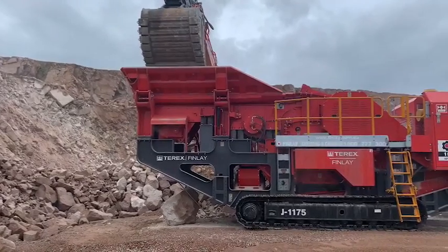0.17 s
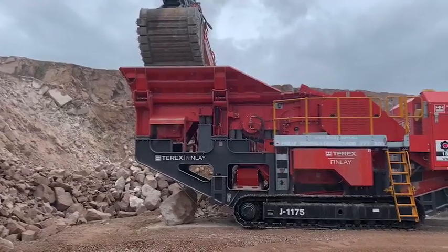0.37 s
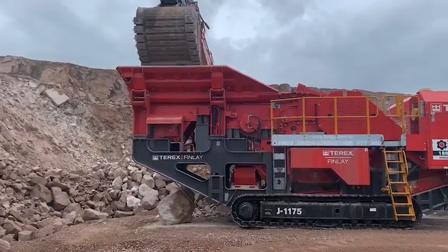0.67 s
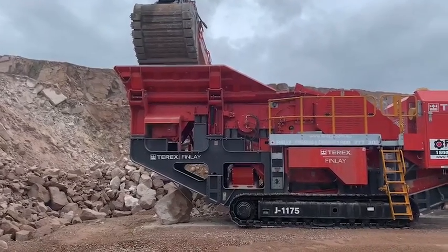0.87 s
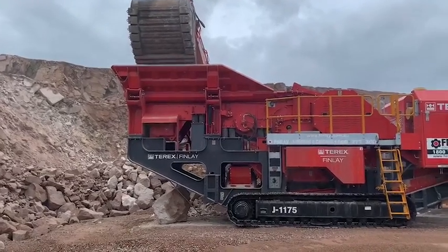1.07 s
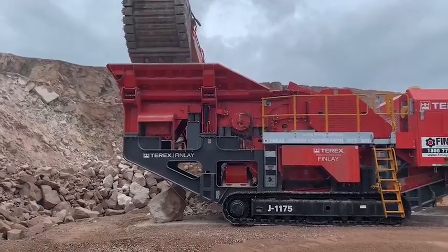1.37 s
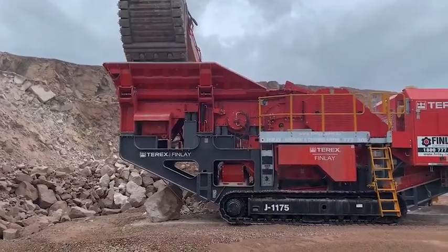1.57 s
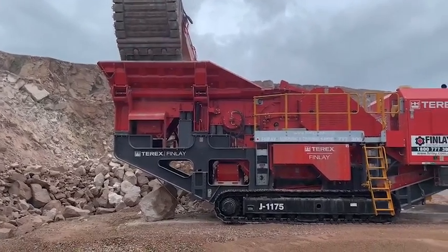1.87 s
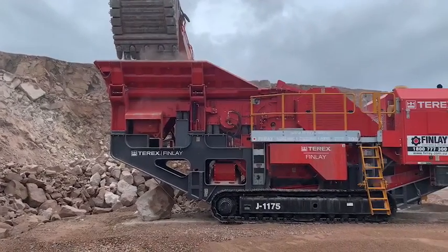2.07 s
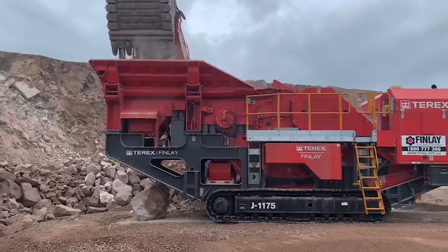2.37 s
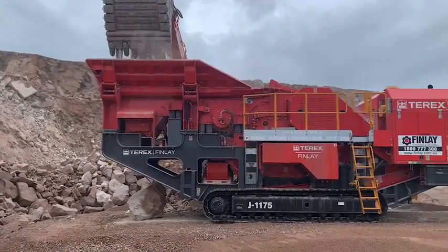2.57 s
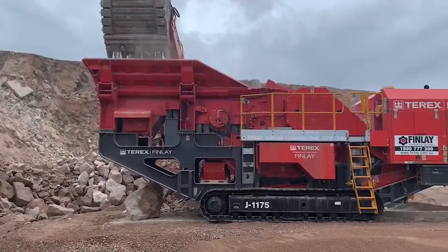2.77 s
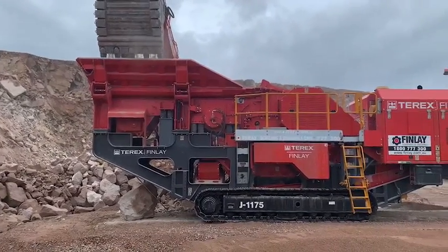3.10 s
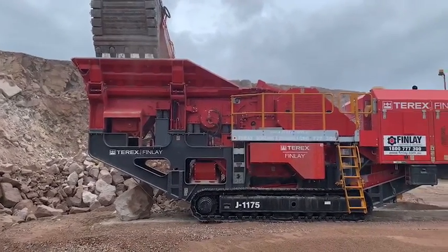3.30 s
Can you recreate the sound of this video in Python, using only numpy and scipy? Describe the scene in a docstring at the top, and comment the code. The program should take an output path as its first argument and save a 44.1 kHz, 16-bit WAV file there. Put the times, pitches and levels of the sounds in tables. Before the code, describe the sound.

A rock crusher crunches stone in uneven bites over a droning diesel in a quarry. Boulders thud on its steel hopper with a short echo. The rattling thins midway, then swells, and two bright clanks end it.

```python
"""A tracked jaw crusher works in a quarry. From the start its diesel drones and roars, broken stone
rattles through, and the jaw bites hardest as boulders thud on the steel hopper and jaw plates, with a
short echo off the quarry face. Two low clanks follow. Near 1.5 s the engine dips briefly and the stream
of stone thins, while the jaw crunches on in uneven bites, several a second. More boulders land, the
stream swells near 2.8 s, and two bright clanks ring out at the end."""
import sys
import numpy as np
from scipy import signal
from scipy.fft import rfft, irfft, next_fast_len
from scipy.io import wavfile
from scipy.ndimage import uniform_filter1d, map_coordinates

SR = 44100
rng = np.random.default_rng(int(sys.argv[2]) if len(sys.argv) > 2 else 0)


def waveform_to_disk(signal):
    """Save audio, clipped to [-1, 1], as 16-bit WAV at the path in sys.argv[1]."""
    frames = np.transpose(np.atleast_2d(signal))
    scaled = np.clip(frames, -1, 1) * 32767
    samples = np.round(scaled).astype(np.int16)
    wavfile.write(sys.argv[1], SR, samples)


N = 151704


def amp(db):
    """Decibels to linear gain."""
    return 10 ** (np.asarray(db) / 20)


def unit_rms(x):
    """Normalise to an rms of 1."""
    return x / np.sqrt(np.mean(x ** 2) + 1e-20)


def curve_at(points, hz):
    """Read (frequency, value) breakpoints on a log frequency axis."""
    freqs, values = np.transpose(points)
    return np.interp(np.log(hz + 1), np.log(freqs + 1), values)


def automation(points):
    """Draw a fader line through (time, value) breakpoints."""
    times, values = np.transpose(points)
    return np.interp(np.arange(N) / SR, times, values)


def wobble(rate):
    """A smooth random modulator with `rate` knots a second."""
    knots = rng.standard_normal(int(N * rate / SR) + 4)
    return map_coordinates(knots, [np.arange(N) * rate / SR])


def eq(x, response):
    """Zero-phase EQ; response(hz) gives the gain."""
    size = next_fast_len(N + SR // 2)
    return irfft(rfft(x, size) * response(np.fft.rfftfreq(size, 1 / SR)), size)[..., :N]


def patchy(x, depth_db=2.5):
    """Make the colour flicker with random patches of gain over time and pitch."""
    spectra = signal.stft(x, nperseg=512)[2]
    patches = uniform_filter1d(rng.standard_normal(spectra.shape[1:]), size=5, axis=0)
    patches = uniform_filter1d(patches, size=8, axis=1)
    return signal.istft(spectra * amp(depth_db * unit_rms(patches)), nperseg=512)[1][:, :N]


# Resonances of the steel plates: (centre [Hz], width [Hz], boost [dB])
PLATE_MODES = [(244, 11, -3), (522, 235, 8), (1047, 87, 8.5), (1594, 107, 7), (2156, 220, 3),
               (4235, 1400, 8)]
# Stereo image, 1 being mono: (frequency [Hz], left-right correlation [0..1])
STEREO_IMAGE = [(60, 0.86), (290, 1), (640, 0.76), (1410, 0.63), (3100, 0.054), (15000, 0.28)]


def through_steel(pair, tone):
    """Colour two unrelated signals with a tone curve and the plate resonances; mix to stereo at rms 1."""
    def response(hz):
        low_cut_tone = [(tone[0][0] * .7, -90)] + list(tone)
        boost_db = sum(db / (1 + (2 * (hz - centre) / width) ** 2) for centre, width, db in PLATE_MODES)
        width_angle = np.arccos(np.clip(curve_at(STEREO_IMAGE, hz), -1, 1)) / 2
        return amp(curve_at(low_cut_tone, hz) + boost_db) * [np.cos(width_angle), np.sin(width_angle)]
    mid, side = eq(pair, response)
    return unit_rms(np.array([mid + side, mid - side]))


# Fader ride of the diesel's firing tone: (time [s], level [dB])
DRONE_FADER = [(0, -33), (1.1, -31), (1.45, -29), (2.0, -28.5), (2.25, -33), (2.8, -34), (3.05, -29.5),
               (3.44, -31)]
# Tone of engine, fan and belts: (frequency [Hz], level [dB])
ROAR_TONE = [(40, -7.5), (60, -3), (96, -1), (150, -7.5), (260, -2), (400, -16), (600, -15.5),
             (1050, -19.5), (2000, -24.5), (3000, -30.5), (4300, -35.5), (8000, -36), (15600, -45.5)]


def engine(firing_hz=94.3, waver_db=2.2, roar_db=-23.5, throb_depth=0.092):
    """The bed: an unsteady diesel drone at the firing rate, over a broad roar that throbs with it."""
    t = np.arange(N) / SR
    phase = 2 * np.pi * np.cumsum(firing_hz + 1.42 * wobble(8.03)) / SR
    drone = np.sqrt(2) * amp(automation(DRONE_FADER) + waver_db * wobble(13)) * np.sin(phase)
    roar = through_steel(patchy(rng.standard_normal((2, N))), ROAR_TONE)
    throb = 1 + throb_depth * np.cos(phase)
    dip_db = -5.5 * np.exp(-((t - 1.49) / 0.051) ** 2)
    return amp(dip_db) * (drone + amp(roar_db) * roar * throb)


def stone_grains(per_s, spread_db, smear_t60_s=0.022):
    """Two streams of small random impacts of uneven size, each smeared by the hopper walls."""
    triggers = rng.random((2, N)) < per_s / SR
    hits = triggers * rng.standard_normal((2, N)) * amp(spread_db * wobble(60))
    t = np.arange(SR // 20) / SR
    scatter = rfft(rng.standard_normal(len(t)) * amp(-60 * t / smear_t60_s))
    smear = irfft(scatter / np.abs(scatter), len(t))  # flattened, so it adds no colour
    return signal.fftconvolve(hits, smear[None], axes=1)[:, :N]


# Fader ride of the stone stream: (time [s], level [dB])
RATTLE_FADER = [(0, -20), (.3, -26), (.65, -25), (.95, -29), (1.35, -27.5), (1.48, -32.5), (1.7, -33.5),
                (2.22, -33), (2.8, -25.5), (2.95, -33.5), (3.44, -26.5)]
# Tone of tumbling stone: (frequency [Hz], level [dB])
STONE_TONE = [(100, 11.5), (240, 0.5), (420, -5.5), (620, 0), (1200, -7), (2100, -14.5), (2900, -33.5),
              (8000, -51), (15600, -64)]


def rattle():
    """Broken stone tumbles steadily over the feeder: a gravelly texture with clinks on top."""
    stream = through_steel(stone_grains(per_s=1200, spread_db=1.6), STONE_TONE) + clinks()
    return amp(automation(RATTLE_FADER) + 0.4 * wobble(12)) * stream


def clinks(per_s=240, centre_hz=1900, t60_s=.09, mix_db=-4):
    """Single stones ring briefly, each at its own pitch, panned somewhere along the machine."""
    count, t = int(per_s * N / SR), np.arange(SR // 20) / SR
    start, pan = rng.random((2, count, 1))
    pitch, strength = rng.standard_normal((2, count, 1))
    hz = centre_hz * 2 ** np.clip(.9 * pitch, -1.5, 3)
    level_db = 2.14 * strength + curve_at(STONE_TONE, hz) + 1.9 * pitch
    attack = 1 - np.exp(-t / 0.0077)
    rings = amp(level_db - 60 * t / t60_s) * np.sin(2 * np.pi * hz * t) * attack
    samples = (start * N).astype(int) + np.arange(len(t))
    pan_gains = np.cos(pan * np.pi / 2), np.sin(pan * np.pi / 2)
    stereo = [np.bincount(samples.ravel(), (gain * rings).ravel())[:N] for gain in pan_gains]
    return amp(mix_db) * unit_rms(np.array(stereo))


# Cues for stone on a hopper plate: (time [s], level [dB], pitch [Hz])
CLANK_CUES = [(0.539, -15.5, 244.7), (.812, -11.5, 247.7), (1.205, -23, 1870), (1.69, -32, 4030),
              (1.697, -21.5, 1566), (1.885, -29, 3513), (2.09, -34, 4290), (3.197, -23, 1640),
              (3.361, -22, 1307)]


def clanks(t60_at_1khz_s=0.18, attack_s=0.0055):
    """Metal accents: a stone strikes a plate, which rings at one pitch, shorter when higher."""
    track, t = np.zeros(N + SR), np.arange(SR // 4) / SR
    attack = 1 - np.exp(-t / attack_s)
    for start, db, hz in CLANK_CUES:
        t60 = t60_at_1khz_s / (hz / 1000) ** 0.57
        ring = amp(db - 60 * t / t60) * np.sin(2 * np.pi * hz * t)
        track[round(start * SR):][:len(t)] += ring * attack
    return track[:N]


def quarry_echo(x, t60_s=0.96, predelay_samples=600):
    """The quarry face returns a half-second tail, nearly the same on both sides."""
    t = np.arange(SR // 2) / SR
    mid, side = rng.standard_normal((2, len(t))) * amp(-60 * t / t60_s)
    tail = np.array([mid + 0.37 * side, mid - 0.26 * side])
    delayed = np.pad(x, (predelay_samples, 0))
    return signal.fftconvolve(delayed[None], tail / np.linalg.norm(tail[0]), axes=1)[:, :N]


# Cues for landing boulders: (time [s], ring level [dB], ring pitch [Hz], boom level [dB])
BOULDER_CUES = [(0.051, -5, 156, -12), (0.069, -6, 202, -6.5), (0.175, -13.5, 237, -12),
                (0.503, -12, 225, -27), (0.618, -6.5, 251, -12), (0.678, -10, 284, -37),
                (1.32, -12, 266, -21), (1.357, -11.5, 262, -27), (1.584, -9, 139, -11),
                (1.612, -11, 265, -10), (1.878, -9.5, 280, -26), (2.079, -4, 212, -18),
                (2.097, -18, 122, -24), (2.127, -14.5, 224, -15), (2.587, -11.5, 232, -27),
                (2.606, -15, 130, -14), (2.771, -7.5, 180, -19), (2.802, -9.5, 265, -12),
                (2.835, -11.5, 147, -8), (3.041, -9, 276, -16), (3.248, -9, 238.5, -11)]
# Tone of a rolling boulder: (frequency [Hz], level [dB])
RUMBLE_TONE = [(90, 7.5), (300, 3), (420, -12.5), (700, -7), (1300, -21), (2000, -72)]


def boulders(ring_t60_s=0.098, boom_hz=75, boom_t60_s=0.15, rumble_db=-8, rumble_t60_s=0.35,
             attack_s=0.0055, echo_db=-7.5):
    """The weight: a heavy rock rings a plate briefly, makes the frame boom and rolls on with a rumble."""
    thuds, roll_power = np.zeros((2, N + SR))
    t = np.arange(SR // 2) / SR
    attack = 1 - np.exp(-t / attack_s)
    detunes = 1 + 0.12 * rng.standard_normal(len(BOULDER_CUES))
    for (start, ring_db, ring_hz, boom_db), detune in zip(BOULDER_CUES, detunes):
        ring = amp(ring_db - 60 * t / ring_t60_s) * np.sin(2 * np.pi * ring_hz * t)
        boom = amp(boom_db - 60 * t / boom_t60_s) * np.sin(2 * np.pi * boom_hz * detune * t)
        roll = amp(ring_db + rumble_db - 60 * t / rumble_t60_s)
        thuds[round(start * SR):][:len(t)] += (ring + boom) * attack
        roll_power[round(start * SR):][:len(t)] += (roll * attack) ** 2
    rumble = np.sqrt(roll_power[:N]) * through_steel(rng.standard_normal((2, N)), RUMBLE_TONE)
    return thuds[:N] + amp(echo_db) * quarry_echo(thuds[:N]) + rumble


# Cues for rock breaking or sliding: (peak time [s], rise [s], fall [s], body level [dB], grit level [dB])
CRUNCH_CUES = [(.02, 0.094, 0.15, -19, -33.5), (0.063, 0.021, 0.032, -15.5, -22.5),
               (0.149, 0.052, 0.072, -16, -25), (.43, 0.028, 0.027, -23.5, -38.5),
               (.51, 0.036, 0.041, -23, -35.5), (.69, 0.12, 0.081, -25.5, -35.5),
               (.8, 0.027, 0.066, -25, -36.5), (1.21, 0.071, 0.021, -27.5, -43.5),
               (1.37, 0.05, 0.044, -30.5, -43), (1.599, 0.11, 0.24, -28, -37.5),
               (1.87, 0.036, 0.081, -25.5, -35), (1.99, 0.046, 0.042, -25.5, -41),
               (2.1, 0.036, 0.12, -28.5, -32.5), (2.61, 0.035, 0.14, -32, -37),
               (2.79, 0.05, 0.12, -24.5, -31), (3.04, 0.03, 0.047, -22.5, -37),
               (3.198, 0.0036, 0.033, -24, -32), (3.29, 0.085, 0.046, -30.5, -41)]
# Lows and mids of a crunch: (frequency [Hz], level [dB])
BODY_TONE = [(150, 1.5), (330, 0), (430, -18.5), (600, -8.5), (1570, -10.5), (2300, -12), (3100, -25),
             (4000, -70)]
# Gritty top end of a crunch: (frequency [Hz], level [dB])
GRIT_TONE = [(2200, -6.5), (3000, -1), (4500, -2.5), (9000, -3), (15600, -23)]


def jaw_crunches(cracks_per_s=2500, spread_db=1.2):
    """The lead: each squeeze of the jaw swells into a burst of cracks and ringing stones, then dies away."""
    t = np.arange(N) / SR
    body_gain, grit_gain = np.zeros((2, N))
    for peak, rise, fall, body_db, grit_db in CRUNCH_CUES:
        swell = np.exp(-((t - peak) / rise) ** 2)
        decay = np.exp(-np.abs(t - peak) / fall)
        envelope = np.where(t < peak, swell, decay)
        body_gain = np.hypot(body_gain, amp(body_db) * envelope)  # overlapping bites add in power
        grit_gain = np.hypot(grit_gain, amp(grit_db) * envelope)
    body = through_steel(stone_grains(cracks_per_s, spread_db), BODY_TONE) + clinks()
    grit = through_steel(patchy(stone_grains(3 * cracks_per_s, spread_db)), GRIT_TONE)
    return body_gain * body + grit_gain * grit


def scene():
    """Mix all layers and lean them 1 dB to the right."""
    return (engine() + rattle() + jaw_crunches() + boulders() + clanks()) * amp([[-0.5], [0.5]])


def record(dry, low_cut_hz=50, ceiling=1.3, high_cut_hz=15700):
    """Master chain: low cut, soft clipper, brick-wall high cut."""
    tight = eq(dry, lambda hz: 1 / np.sqrt(1 + (low_cut_hz / (hz + 1)) ** 8))
    rounded = tight / (1 + np.abs(tight / ceiling) ** 4) ** .25
    return eq(rounded, lambda hz: hz < high_cut_hz)


dry = scene()
out = record(dry)
waveform_to_disk(out)
```